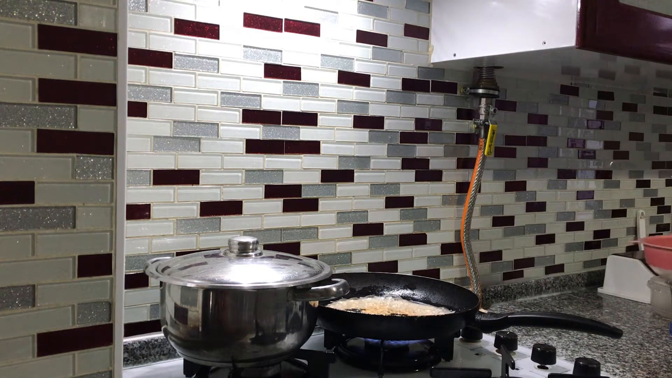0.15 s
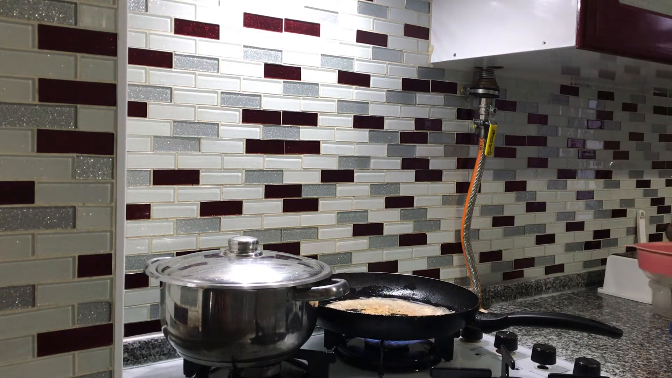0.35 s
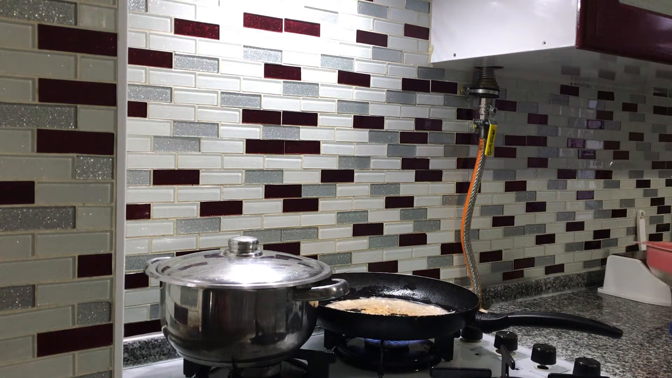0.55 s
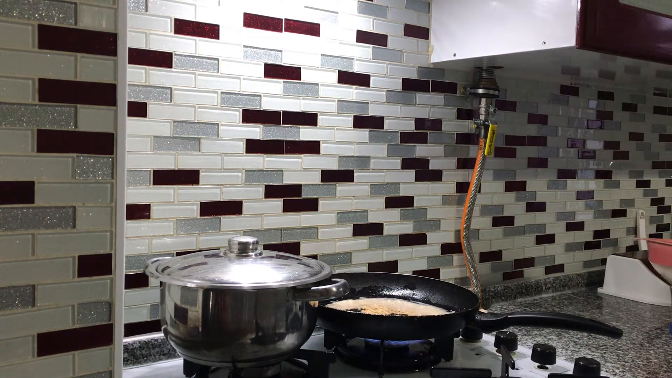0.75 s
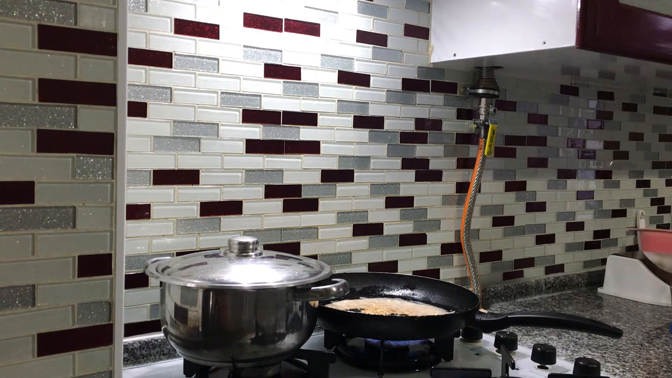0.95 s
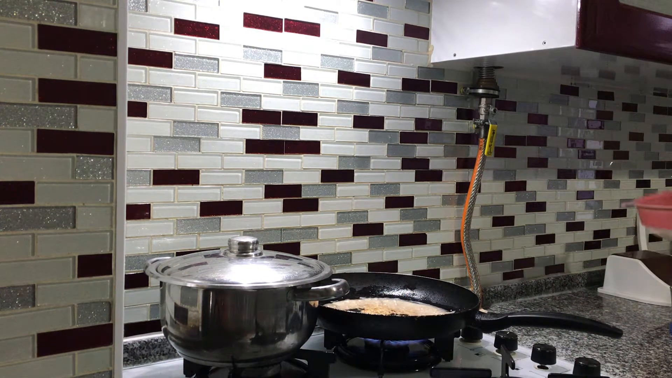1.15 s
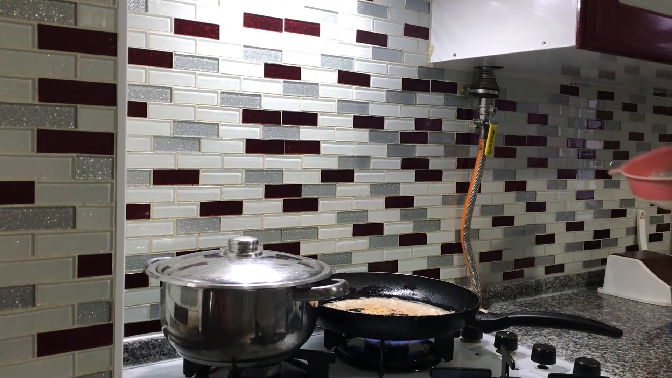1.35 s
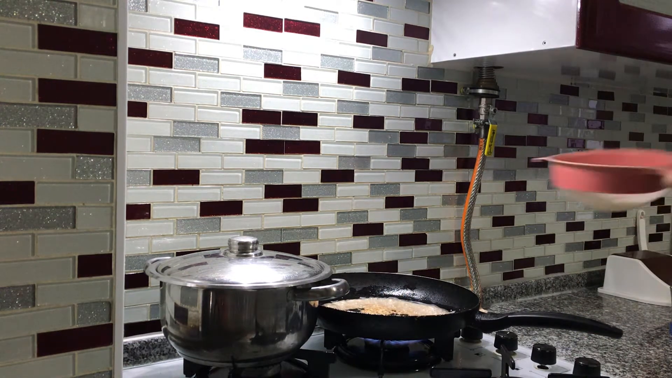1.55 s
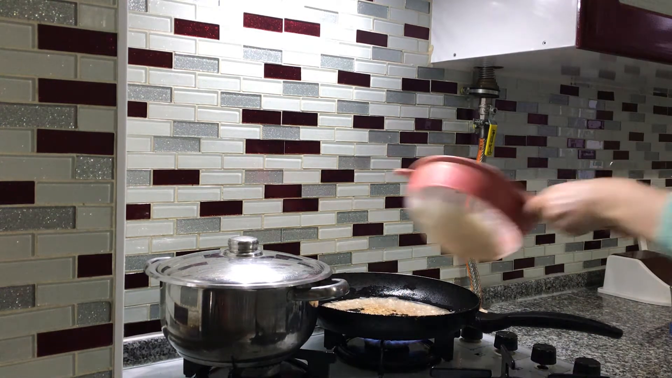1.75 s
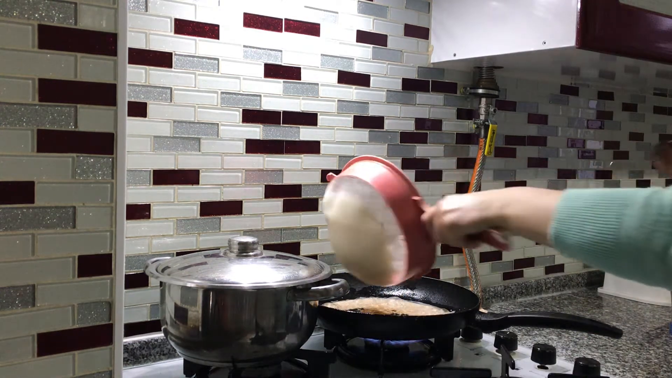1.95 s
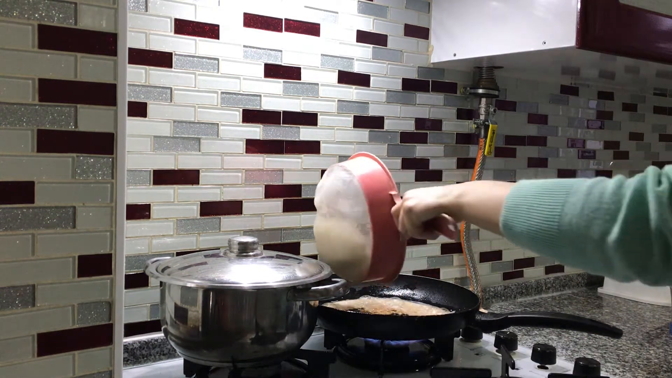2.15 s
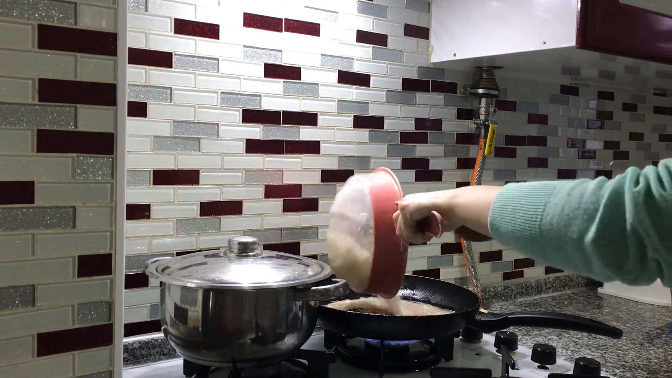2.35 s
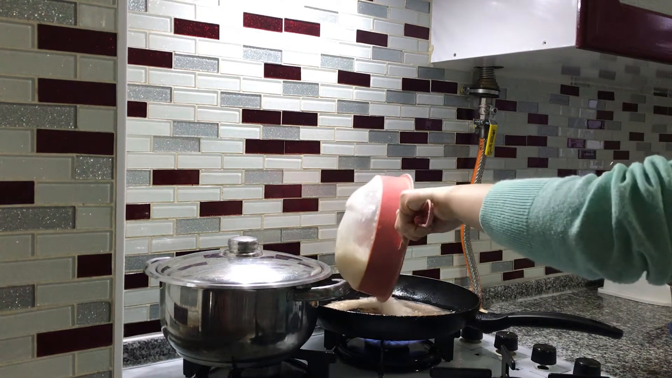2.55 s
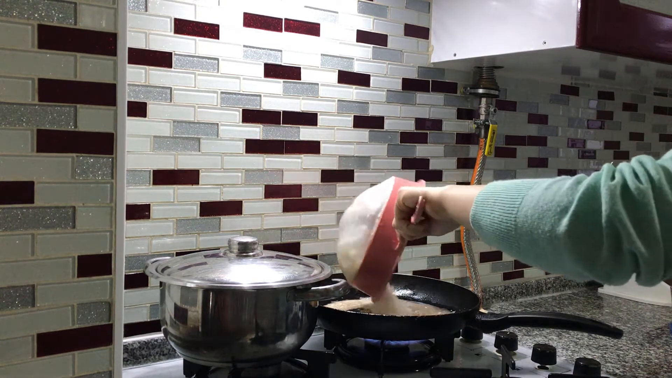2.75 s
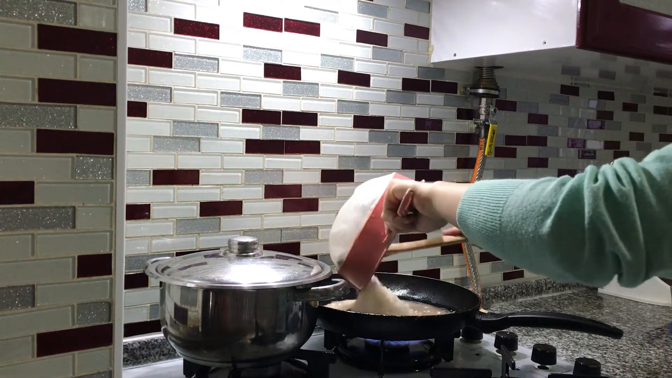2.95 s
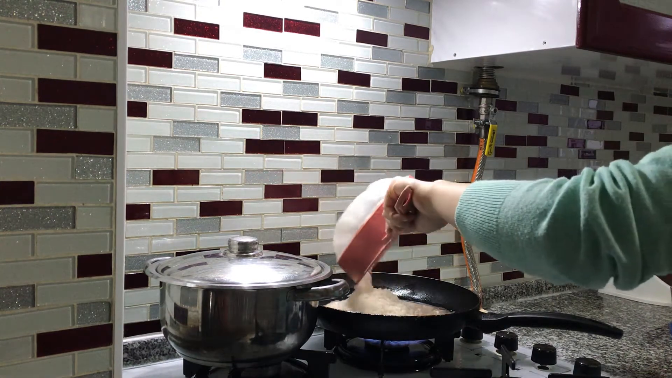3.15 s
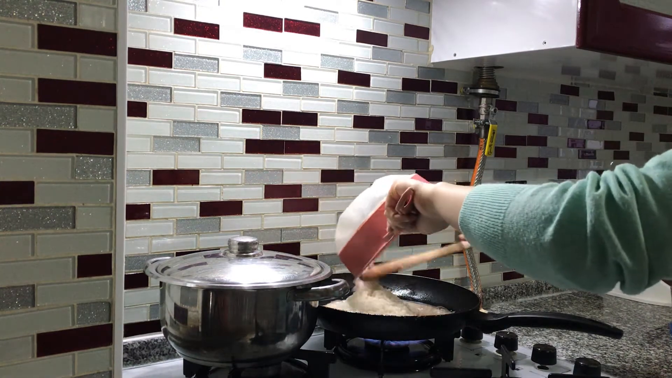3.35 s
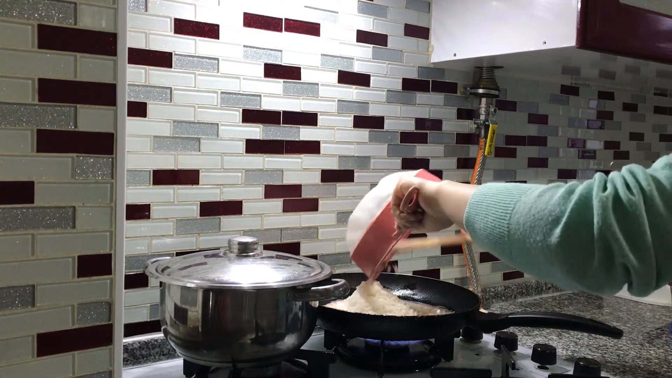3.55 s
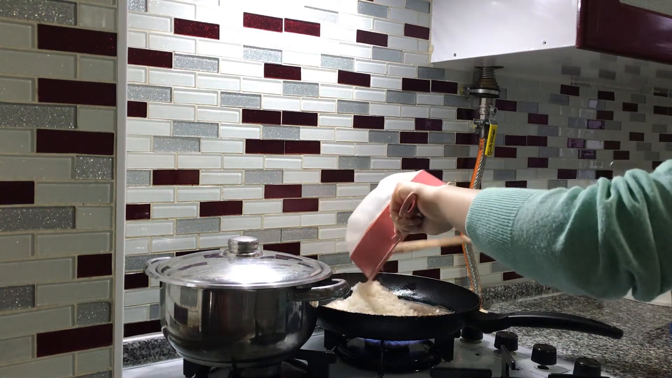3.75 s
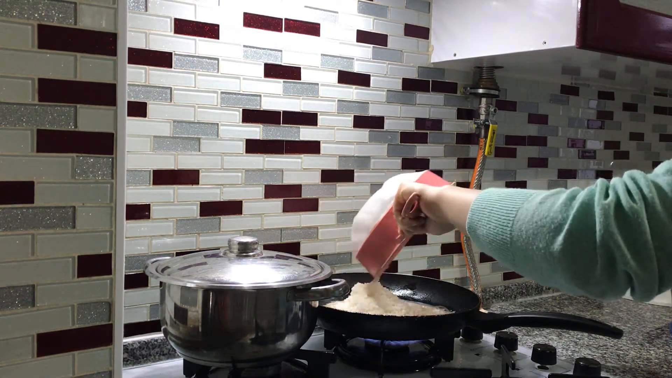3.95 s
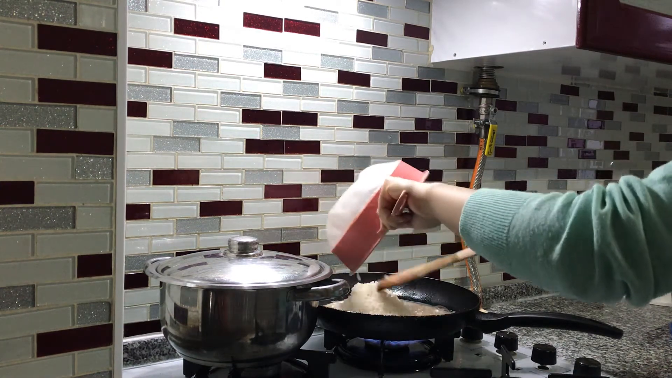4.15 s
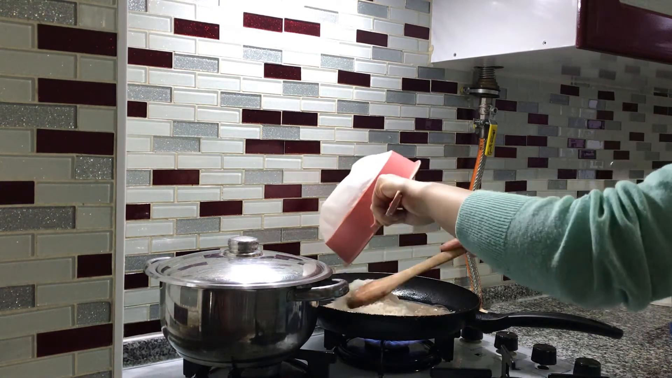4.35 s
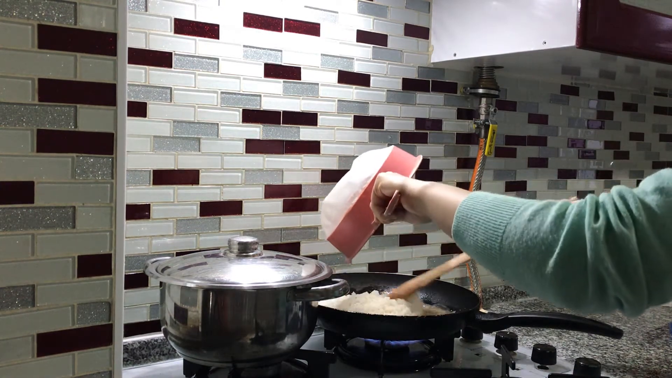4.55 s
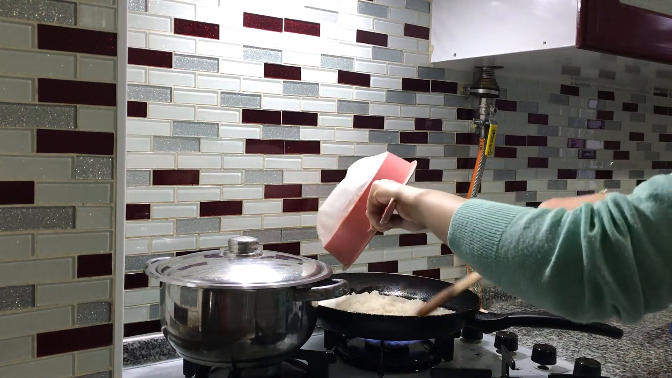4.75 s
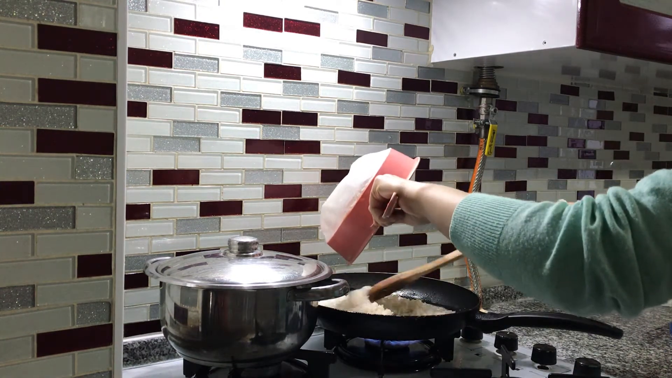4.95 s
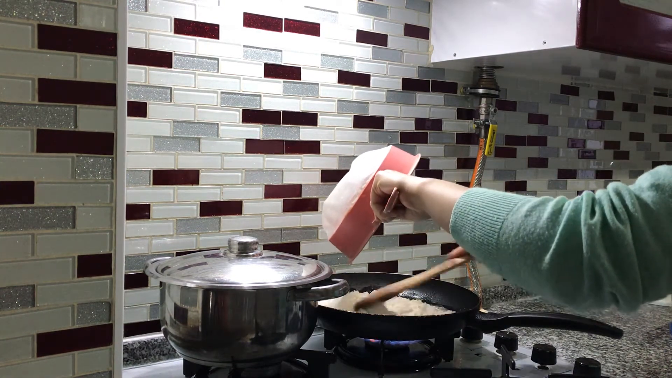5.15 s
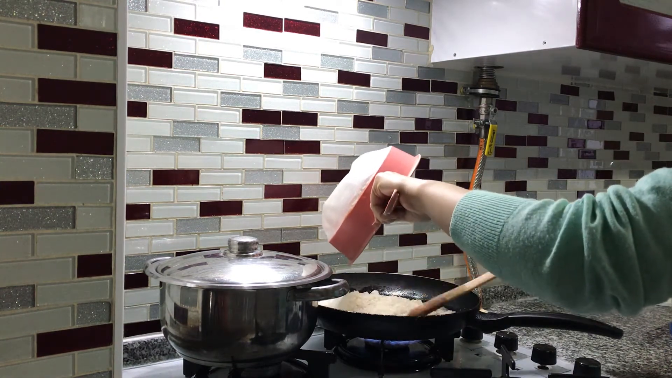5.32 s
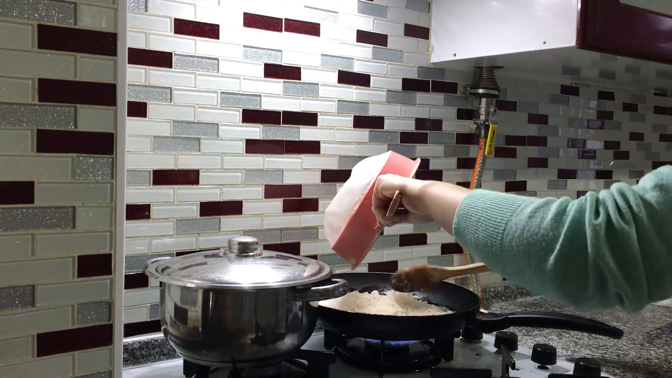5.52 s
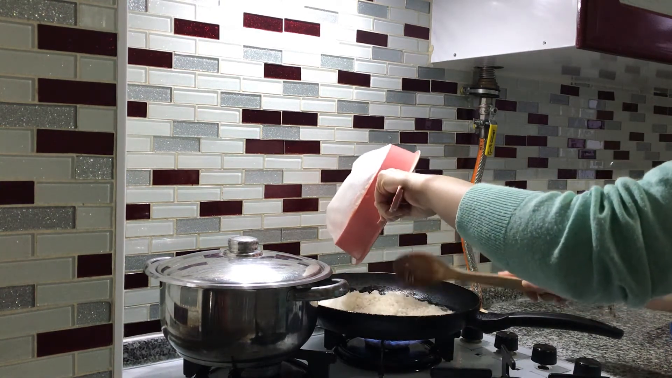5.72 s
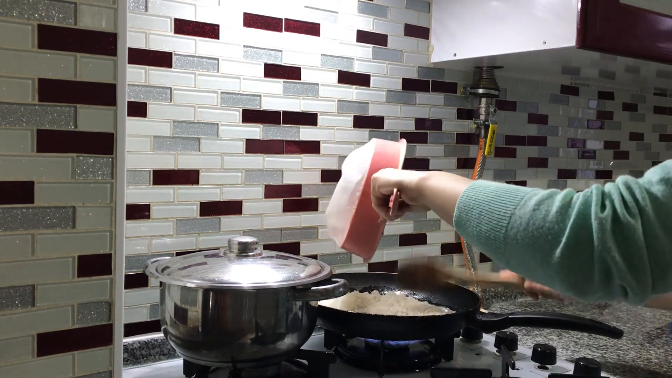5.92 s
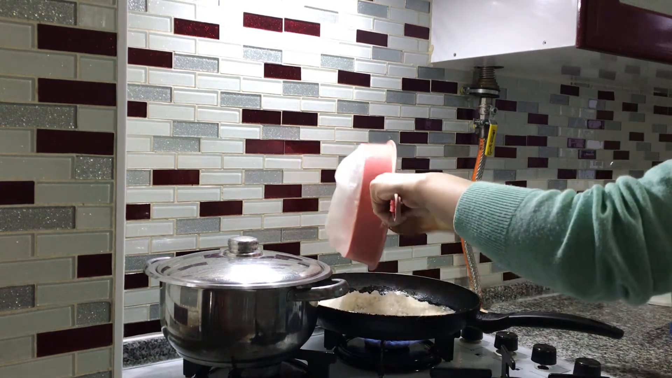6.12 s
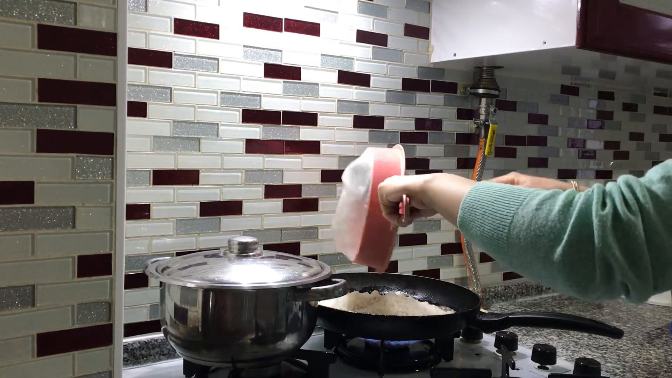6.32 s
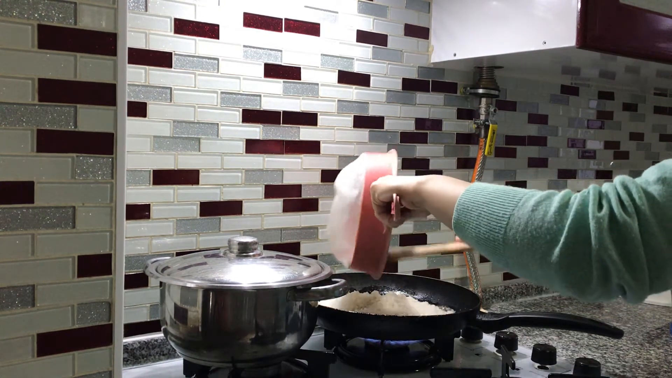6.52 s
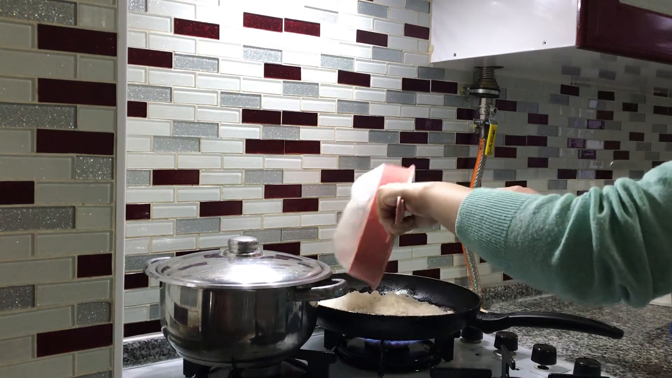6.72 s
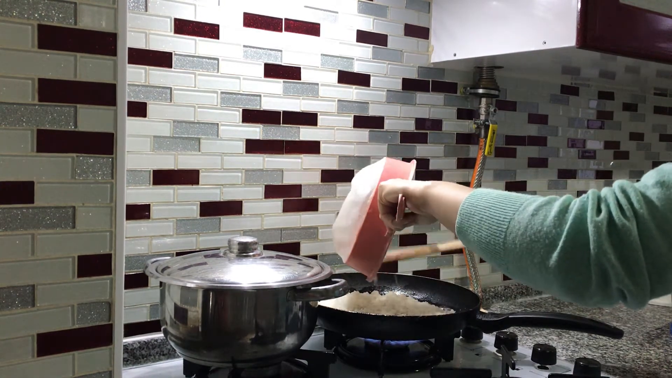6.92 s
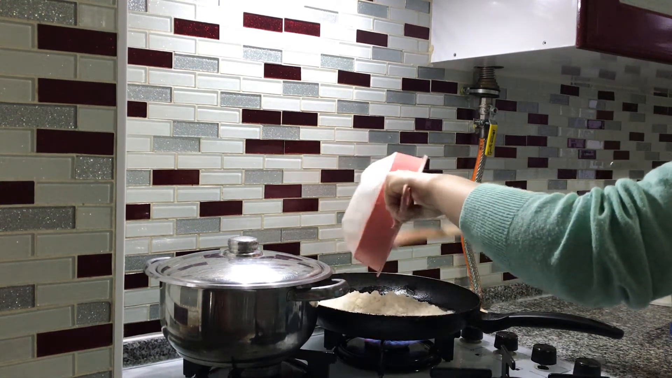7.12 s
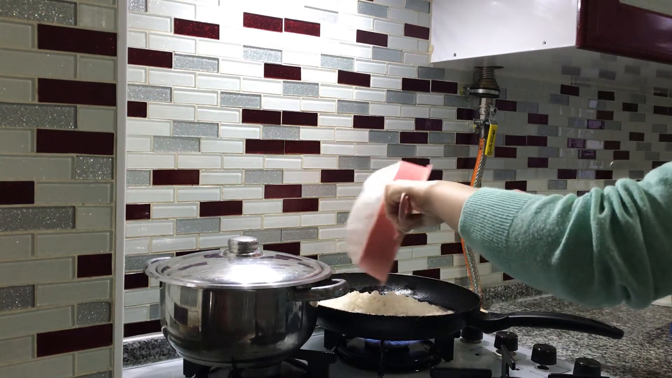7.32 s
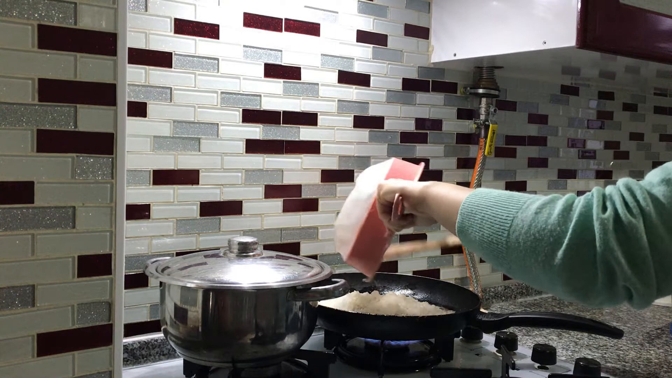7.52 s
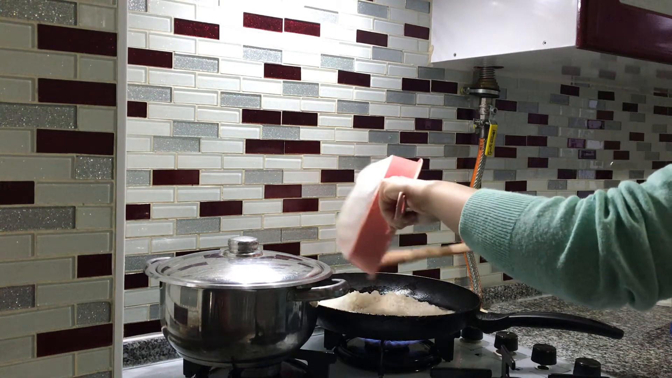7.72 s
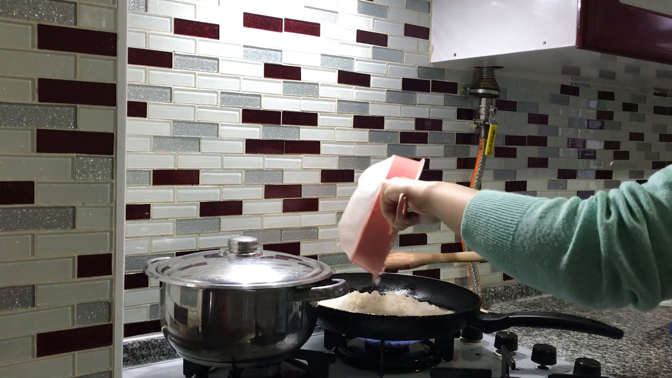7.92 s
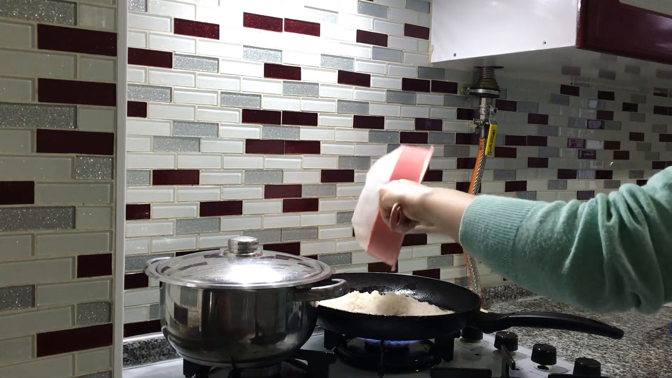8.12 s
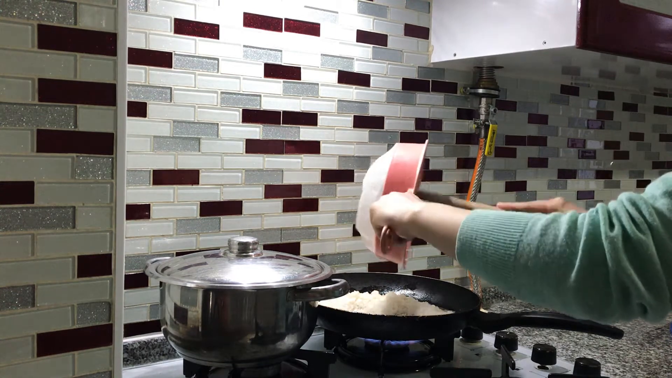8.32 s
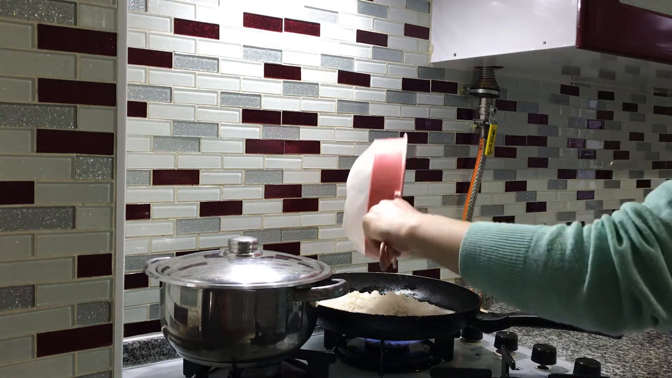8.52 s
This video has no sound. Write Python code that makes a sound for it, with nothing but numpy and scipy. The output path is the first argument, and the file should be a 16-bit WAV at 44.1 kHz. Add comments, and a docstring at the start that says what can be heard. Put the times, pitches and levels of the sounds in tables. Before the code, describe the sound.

A quiet small tiled kitchen with low burner hum and faintly ticking hot fat. From 0.3 to 1.0 s wood scrapes along a stone counter in grainy, uneven clicks with slight groans, strongest near 0.75. At 1.3 s it is set down with a woody clack and quick small bounces. Around 2.1 s wet rice starts landing in the fat: short hissing flares, a very soft brief mid-pitched tone at 2.35, then sizzle growing quickly until 3.3 s and continuing dense and flickering, a little fuller after 5. Sharp spits and sprays cluster from 2.5 to 3.4, with loud snaps near 4.5, 5.6 and 7.9. At 5.7, 5.86 and 6.02 s a wooden spoon knocks the pan rim, low and hollow with rattle. From 6.3 to 8.4 s eight dull plastic sieve taps follow, the last two strongest. The sizzle continues to the end, at 8.6 s.

```python
"""Wet rice sizzles in hot fat in a frying pan: steam gives a flickering hiss, bubbles short decaying tones.
Spits of fat pop and spray over it; a soft brief tone sounds once early in the sizzle. Before the rice goes
in, wood scrapes along the counter as uneven clicks and is set down as ringing modes. Later a wooden spoon
knocks three times on the pan rim (modes, crack and rattle) and taps the plastic sieve (dull filtered noise).
A burner and room hum and the echo of a small tiled kitchen surround it; one microphone feeds both channels."""
import sys
import numpy as np
from scipy import signal
from scipy.fft import rfft, irfft
from scipy.io import wavfile
from scipy.ndimage import uniform_filter1d

SR = 44100
rng = np.random.default_rng(int(sys.argv[2]) if len(sys.argv) > 2 else 0)


def materialize(psi):
    """Save the field psi as 16-bit PCM at rate SR to the path in sys.argv[1].

    A 1-D psi becomes a single channel; in a 2-D psi each row is a channel.
    """
    bounded = np.clip(np.atleast_2d(psi).T, -1, 1)
    quanta = np.round(bounded * 32767).astype(np.int16)
    wavfile.write(sys.argv[1], SR, quanta)


N = 378378  # length in samples

# All spectra are relative: their overall level is set where they are used.
# Burner and room: (frequency [Hz], density [dB per Hz])
HUM_SPECTRUM = [(15, -66), (25, -11.5), (56, -5), (129, 1), (148, -2.5), (162, -14.5), (224, -14.5),
                (375, -28), (401, -21.5), (437, -30), (510, -27), (1500, -27.5), (1950, -70), (3300, -120)]
HUM_DB = -54.5

# Decay of the kitchen echo: (frequency [Hz], t60 [s])
ECHO_DECAY = [(200, 0.45), (1000, 0.43), (4000, 0.18), (12000, 0.36)]
ECHO_DB = -8.0

# Rasp of one push along the counter: (time [s], level [dB])
RASP_LEVEL = [(0.3, -56), (0.38, -62), (0.422, -50.5), (0.494, -55), (0.582, -41), (0.66, -39.5),
              (0.74, -36.5), (0.8, -37), (0.9, -43.5), (0.97, -49), (1.005, -64)]
# Colour of the rasp: (frequency [Hz], density [dB per Hz])
RASP_SPECTRUM = [(350, -45), (600, -34), (812, -10), (915, -10.5), (1960, -12.5), (2430, -7), (2840, -7.5),
                 (3120, -7.5), (4450, -11), (4880, -18), (6000, -12), (14000, -30.5)]
# The wood catches and groans: (time [s], length [s], level [dB], frequency [Hz])
GROANS = [(0.297, 0.26, -60, 660), (0.414, 0.039, -49.5, 1140), (0.518, 0.14, -51, 350),
          (0.793, 0.2, -50, 821), (0.842, 0.15, -53, 238)]
DRAG = 0.35  # contact with the counter shortens the ring by this factor
SCRAPE_RING_DB = -6  # ring of the wood relative to the rasp

# Landing and bounces of the wood: (time [s], strength [dB])
LANDINGS = [(1.285, -6), (1.309, -17), (1.357, -16.5), (1.411, -29)]
# Modes of the wood, ringing freely: (frequency [Hz], relative level [dB], t60 [s])
WOOD_MODES = [(250, -11, 0.19), (428, -18, 0.18), (684, -31, 0.13), (845, 5.5, 0.11), (980, -31, .15),
              (1140, 2.5, 0.15), (1710, -17, 0.082), (1807, -0.5, 0.11), (2200, -17, 0.063),
              (2620, 2.5, 0.053), (3200, -23, .08), (3640, -16, 0.053), (4000, -8, 0.044)]
# Crack of the landing: (frequency [Hz], density [dB per Hz])
CRACK_SPECTRUM = [(88, -36), (150, -16.5), (468, -13), (1130, 0), (1490, -20), (1770, -10), (2600, -15.5),
                  (3600, -16), (15000, -36)]
LANDING_RING_DB, LANDING_CRACK_DB = -6.5, -7.0  # peaks relative to the landing's strength

# A soft brief tone near 800 Hz, then a weaker, lower murmur
TONE_S, TONE_DB, TONE_HZ, TONE_RISE_S, TONE_HOLD_S = 2.351, -44, 795, 0.008, 0.043
MURMUR_LENGTH_S, MURMUR_DB, MURMUR_HZ = 0.095, -53, 626

# Spoon on the pan rim, with rebounds: (time [s], strength [dB], rattle relative to strength [dB],
# bright crack relative to strength [dB], change of the modes under 90 Hz [dB])
KNOCKS = [(5.698, -13.5, -6, -25, 2), (5.719, -19.5, -20, -25, -7), (5.862, -9, -9.5, -5.5, -2),
          (5.889, -19, 0.5, -8, -4), (6.007, -19, -7, -20, -6), (6.023, -12, -2.5, -2, -3),
          (6.036, -12, -1.5, -6, 0)]
# Modes of pan and stove top: (frequency [Hz], relative level [dB], t60 [s])
PAN_MODES = [(44, -11, 0.28), (73.8, -0.5, 0.26), (100.2, -2.5, 0.25), (120, -5, 0.206), (164, -6, 0.17),
             (214, -6, 0.17), (233.4, -7.5, 0.1), (326.5, -17, 0.25), (575, -8, 0.094), (646, -28, 0.27),
             (829, -9, 0.064), (940, -31, .1), (1100, -23, 0.067), (1237, -17.5, 0.2), (1635, -11, 0.048),
             (1900, -11, 0.049), (2370, -15.5, 0.091)]
# Rattle of the pan on its grate: (frequency [Hz], density [dB per Hz])
RATTLE_SPECTRUM = [(88, -22), (150, 4.5), (230, -2), (471, -10), (898, -8), (1040, -4.5), (2070, -18.5),
                   (5000, -39), (6500, -45), (11000, -120)]
KNOCK_RING_DB = -2.5  # peak of the ring relative to the knock's strength
# Spoon against the sieve: (time [s], peak [dB], pitch [Hz], low thud [dB])
TAPS = [(6.289, -23.5, 2050, -35.5), (6.545, -21, 2520, -54), (6.57, -25, 1190, -49),
        (6.869, -22.5, 3120, -58), (7.119, -23, 2260, -39), (7.887, -22, 2590, -37),
        (8.139, -14.5, 2500, -46), (8.41, -16.5, 2700, -39)]
TAP_Q = 1.9

# The loudest spits of fat: (time [s], pop peak [dB], pitch [Hz], spray peak [dB])
SPITS = [(0.092, -38, 12000, -39), (1.7884, -41, 10300, -45), (2.277, -36, 5000, -31.5),
         (2.4496, -27, 9300, -28), (2.5654, -18, 10200, -26), (2.587, -13, 13700, -20),
         (2.6868, -23, 9450, -21.5), (2.708, -24, 9200, -21.5), (2.75, -21, 10000, -26),
         (2.851, -17, 11500, -20), (2.9388, -28, 7100, -18), (3.0548, -17, 12200, -22),
         (3.087, -24, 9100, -17.5), (3.111, -17, 12100, -16.5), (3.3883, -11, 14100, -19),
         (3.729, -13, 11000, -24), (4.4965, -10, 13500, -33), (4.64, -27, 9200, -15.5),
         (5.043, -14.5, 4630, -20.5), (5.1326, -14, 5600, -17.5), (5.6194, -6, 9800, -14.5),
         (6.8205, -20, 4500, -17), (7.099, -13, 5770, -14.5), (7.4, -17, 6000, -17),
         (7.9227, -11, 8450, -16), (7.978, -21, 4000, -19)]
# Smaller spits at random: mean rate, highest peaks of pop and spray relative to the vigour, pitch range
STRAY_PER_S, STRAY_DB, STRAY_SPRAY_DB, STRAY_HZ = 4.7, 12, 3, (3950, 13000)

# Slow swell of the boiling rice: (time [s], vigour [dB])
BOIL_LEVEL = [(2.05, -78), (2.12, -51), (2.3, -54), (2.5, -45.5), (2.75, -36), (3.0, -32.5), (3.3, -31),
              (4.1, -30), (4.8, -30.5), (5.15, -27), (5.7, -27.5), (6.3, -26), (7.2, -27), (7.6, -27),
              (8.58, -27)]
# The first wet clumps land and flare: (time [s], level [dB])
CLUMPS = [(2.195, -41), (2.352, -35), (2.59, -40), (2.685, -52)]
FLARE_RISE_S, FLARE_T60_S = 0.013, 1
# Small steam bubbles: (frequency [Hz], density [dB per Hz])
FIZZ_SPECTRUM = [(1120, -34), (1900, -12), (3580, -3), (4930, -1), (5790, -2.5), (9460, -2), (10400, -3),
                 (14500, -3.5), (16000, -8.5)]
# Larger bubbles sounding through the pan: (frequency [Hz], density [dB per Hz])
BODY_SPECTRUM = [(120, -50), (200, -38), (345, -8), (438, -19), (545, -11.5), (731, -14), (1230, 1),
                 (1420, -7.5), (1580, -3.5), (2700, -4), (3510, -1.5), (5940, -120)]
# Level of the larger bubbles relative to the fizz at a full boil, and its change per dB of vigour
BODY_DB, BODY_SLOPE, FULL_BOIL_DB = -16, -0.37, -28
# Fat ticking over, with or without rice: (frequency [Hz], density [dB per Hz])
IDLE_SPECTRUM = [(290, -41), (500, -13), (1400, -5), (1640, 0), (2190, -5), (3340, -3.5), (5710, -4.5),
                 (7860, -5.5), (10500, -7), (16000, -10.5)]
IDLE_DB = -56.5

# Dips from the microphone housing: (frequency [Hz], width [Hz], depth [dB])
HOUSING_DIPS = [(4950, 155, -6), (7610, 400, -4), (10430, 560, -5)]
# The level dips briefly: (time [s], length [s], change below the split [dB], change above the split [dB])
LEVEL_DIPS = [(0.324, .02, -6, -9), (0.603, .016, -3, -6), (0.835, .02, -4, -7), (0.951, .016, -3, -7),
              (0.997, .016, -4, -7), (2.18, 0.016, -9, -8), (2.251, .016, -9, -6), (2.366, .014, -4, -6),
              (2.665, 0.033, -35, -6.5), (3.017, 0.016, -9, -7), (3.482, .018, -13, -7),
              (3.575, .016, -13, -7), (3.691, .016, -10, -5), (3.807, .016, -11, -8), (3.9, .018, -12, -9),
              (3.969, .016, -10, -4), (4.318, .018, -10, -4), (4.594, 0.055, -36, -7),
              (4.991, 0.016, -9, -6), (6.012, 0.016, 0, -9)]
BASS_CUT_HZ, SPLIT_HZ, EDGE_HZ = 44, 2300, 15900


def gain_of(db):
    """Logarithmic level: 20 dB are a factor of ten in amplitude."""
    return 10 ** (np.asarray(db) / 20)


def evened(x):
    """Power normalisation: scales to an rms of 1."""
    return x / np.sqrt(np.mean(x ** 2) + 1e-20)


def peaked(x, db):
    """Peak normalisation: scales the largest excursion to a level."""
    return gain_of(db) * x / abs(x).max()


def read(points, hz):
    """Interpolation along a logarithmic frequency axis."""
    f, value = np.transpose(points)
    return np.interp(np.log(hz + 1), np.log(f + 1), value)


def level_curve(points):
    """Linear interpolation of a level over time, sample by sample."""
    s, db = np.transpose(points)
    return np.interp(np.arange(N) / SR, s, db)


def colour(x, points):
    """Spectral shaping: weights each frequency of a wide sound, then scales to an rms of 1."""
    weight_db = read(points, np.fft.rfftfreq(len(x), 1 / SR))
    return evened(irfft(rfft(x) * gain_of(weight_db), len(x)))


def add(mix, s, sound):
    """Superposition: adds a sound to the mix from a given time on."""
    part = mix[round(s * SR):][:len(sound)]
    part += sound[:len(part)]


def ringing(modes, detune=0):
    """Modal decay: a blow excites dying sines, pitches and weights shifting as it lands elsewhere."""
    t = np.arange(SR // 2) / SR
    out = np.zeros(len(t))
    for hz, db, t60 in modes:
        pitch_shift, weight_shift = detune * rng.standard_normal(2)
        envelope = gain_of(db + 86 * weight_shift - 60 * t / t60)
        out += envelope * np.sin(2 * np.pi * hz * (1 + pitch_shift) * t)
    return out


def puff(t60, points=None, size=12000):
    """Exponential decay of a noise burst, white or with a spectrum."""
    noise = rng.standard_normal(size)
    if points is not None:
        noise = colour(noise, points)
    return noise * gain_of(-60 * np.arange(size) / SR / t60)


def resonate(x, hz, keep):
    """Narrow resonance by heterodyning: shift its frequency to zero, smooth, shift back."""
    turn = np.exp(2j * np.pi * hz * np.arange(len(x)) / SR)
    smooth = signal.lfilter([1], [1, -keep], x / turn)
    return evened((turn * smooth).real)


def seethe(patchy_db, flicker_db):
    """Modulated noise: white hiss drifts in patches and flickers in bursts with sudden start, slow end."""
    frames = N // 64 + 5
    real, imaginary, patches = rng.standard_normal((3, 129, frames))
    patches = uniform_filter1d(patches, 12, 0)  # smooth across frequency, then time
    patches = evened(uniform_filter1d(patches, 14, 1))
    kicks = np.minimum(rng.exponential(1, frames), 4.5) ** 2 - 2
    bursts = evened(signal.lfilter([1], [1, -0.9], kicks))
    z = (real + 1j * imaginary) * gain_of(patchy_db * patches + flicker_db * bursts)
    return evened(signal.istft(z, nperseg=256, noverlap=192)[1][:N])


def hum():
    """Stationary noise: burner and room sound as low noise with slight drift."""
    return gain_of(HUM_DB) * colour(seethe(0.91, 0.46), HUM_SPECTRUM)


def kitchen(x):
    """Reverberation: tiled walls return a noise tail whose bands die at their own speeds."""
    hz, t, z = signal.stft(rng.standard_normal(SR // 2), SR, nperseg=256)
    decay = gain_of(-60 * t / read(ECHO_DECAY, hz)[:, None])
    tail = signal.istft(z * decay, SR, nperseg=256)[1]
    tail = np.append(np.zeros(200), tail)  # delay in samples before the echo
    # too small a room to hold the deepest bass
    x = signal.lfilter(*signal.butter(2, 140, "high", fs=SR), x)
    return signal.oaconvolve(x, tail / np.linalg.norm(tail))[:N]


def slide():
    """Friction: wood scrapes over stone in dense uneven clicks that make it ring and groan."""
    t = np.arange(N) / SR
    moving = (t > RASP_LEVEL[0][0]) * (t < RASP_LEVEL[-1][0])
    grit = seethe(1.5, 0.62) * gain_of(0.7 * np.minimum(rng.exponential(1, N), 5))
    dragged_modes = [(hz, db, t60 * DRAG) for hz, db, t60 in [WOOD_MODES[3]] + WOOD_MODES[5:]]
    ring = evened(signal.oaconvolve(grit, ringing(dragged_modes))[:N])
    scrape = colour(grit, RASP_SPECTRUM) + gain_of(SCRAPE_RING_DB) * ring
    out = moving * gain_of(level_curve(RASP_LEVEL)) * scrape
    for s, length, db, hz in GROANS:
        swell = np.sin(np.pi * np.arange(0, length, 1 / SR) / length)
        groan = resonate(grit[round(s * SR):][:len(swell)], hz, 1 - 1e-4)
        add(out, s, gain_of(db) * swell * groan)
    return out


def set_down():
    """Impact: each landing and bounce excites the modes of the wood and a crack."""
    out = np.zeros(N)
    for s, db in LANDINGS:
        add(out, s, peaked(ringing(WOOD_MODES, 0.018), db + LANDING_RING_DB))
        add(out, s, peaked(puff(0.19, CRACK_SPECTRUM), db + LANDING_CRACK_DB))
    return out


def soft_tone():
    """Brief tone: a short sine with a fuzzy edge, then a lower narrow-band murmur."""
    out = np.zeros(N)
    t, late = np.arange(0, TONE_HOLD_S, 1 / SR), np.arange(0, MURMUR_LENGTH_S, 1 / SR)
    fuzz = resonate(rng.standard_normal(len(t)), TONE_HZ, 0.96)
    tone = np.sin(2 * np.pi * TONE_HZ * t) + 0.33 * fuzz
    envelope = np.minimum(np.minimum(t, t[::-1]) / TONE_RISE_S, 1)
    add(out, TONE_S, gain_of(TONE_DB) * envelope * tone)
    murmur = resonate(rng.standard_normal(len(late)), MURMUR_HZ, 0.993)
    swell = np.sin(np.pi * late / MURMUR_LENGTH_S)
    add(out, TONE_S + TONE_HOLD_S, gain_of(MURMUR_DB) * swell * murmur)
    return out


def knocks():
    """Impact on coupled bodies: the spoon shakes pan and stove top, and the pan rattles on its grate."""
    out = np.zeros(N)
    for s, db, rattle_db, crack_db, deep_db in KNOCKS:
        modes = [(hz, mode_db + deep_db * (hz < 90), t60) for hz, mode_db, t60 in PAN_MODES]
        ring = ringing(modes, 0.015)
        # the heavy stove top takes time to move
        ring = ring * (1 - np.exp(-np.arange(len(ring)) / SR / 0.0066))
        crack = signal.lfilter(*signal.iirpeak(4200, 0.6, SR), puff(0.087))
        add(out, s, peaked(ring, db + KNOCK_RING_DB))
        add(out, s, peaked(puff(0.24, RATTLE_SPECTRUM), db + rattle_db))
        add(out, s, peaked(crack, db + crack_db))
    return out


def taps():
    """Damped impact: the spoon on the sieve gives short dull noise and a low thud."""
    out, t = np.zeros(N), np.arange(4000) / SR
    for s, db, hz, thud_db in TAPS:
        add(out, s, peaked(signal.lfilter(*signal.iirpeak(hz, TAP_Q, SR), puff(0.073)), db))
        add(out, s, gain_of(thud_db - 60 * t / 0.028) * np.sin(2 * np.pi * 330 * t))
    return out


def stray_spits(vigour_db):
    """Random arrivals: smaller spits at irregular intervals, their level following the boil."""
    lo, hi = STRAY_HZ
    when = np.cumsum(2 * rng.random(100) / STRAY_PER_S)
    strays = []
    for s in when[when * SR < N]:
        db = vigour_db[int(s * SR)] - 6 * rng.random()
        hz = lo * (hi / lo) ** rng.random()
        strays.append((s, db + STRAY_DB, hz, db + STRAY_SPRAY_DB))
    return strays


def spits(vigour_db):
    """Sudden release: a bursting droplet gives a pop of a few cycles and a short spray."""
    out, t = np.zeros(N), np.arange(3000) / SR
    for s, db, hz, spray_db in SPITS + stray_spits(vigour_db):
        pop = np.sin(2 * np.pi * hz * t) * t * np.exp(-t * hz / 0.94)
        spray = signal.lfilter(*signal.iirpeak(hz, 1.3, SR), puff(0.067, size=3000))
        add(out, s, peaked(pop, db) + peaked(spray, spray_db))
    return out


def vigour():
    """Addition of powers: the level of the boil in dB joins a slow swell and a flare after each clump."""
    t = np.arange(N) / SR
    power = gain_of(level_curve(BOIL_LEVEL)) ** 2 * (t > BOIL_LEVEL[0][0])
    for s, db in CLUMPS:
        age = np.maximum(t - s, 0)
        rise = np.minimum(age / FLARE_RISE_S, 1)
        power = power + (gain_of(db - 60 * age / FLARE_T60_S) * rise) ** 2
    return 10 * np.log10(power + 1e-12)


def bubbles(per_s, spread_db, lo_hz, hi_hz, cycles, count=24):
    """Bubble resonance: bursts at random moments sound as short tones of many pitches, a few large."""
    out = np.zeros(N)
    size = gain_of(spread_db * np.minimum(rng.exponential(1, N), 5))
    size = size * (rng.random(N) < per_s / SR)
    kind = rng.integers(0, count, N)
    for k, hz in enumerate(np.geomspace(lo_hz, hi_hz, count)):
        turns = np.arange(300) * hz / SR
        tone = hz * np.sin(2 * np.pi * turns) * np.exp(-turns / cycles)
        out += signal.oaconvolve(size * (kind == k), tone)[:N]
    return evened(out)


def sizzle(vigour_db):
    """Boiling: water leaves the fat as hiss and crackle on top, larger bubbles below."""
    body_db = BODY_DB + BODY_SLOPE * (vigour_db - FULL_BOIL_DB)
    fizz = seethe(1.7, 0.59) + 0.32 * bubbles(2500, 3.2, 2110, 14700, 0.57)
    body = seethe(0.58, 1.0) + 0.5 * bubbles(700, 1.55, 499, 3500, 2.9)
    # the extra point extends the idle spectrum downwards
    idle = gain_of(IDLE_DB) * colour(seethe(1.3, 1.0), [(250, -40)] + IDLE_SPECTRUM)
    boil = colour(fizz, FIZZ_SPECTRUM) + gain_of(body_db) * colour(body, BODY_SPECTRUM)
    return idle + gain_of(vigour_db) * boil


def scene():
    """Superposition: all sources but the hum also return from the walls."""
    vigour_db = vigour()
    sources = slide() + set_down() + soft_tone() + knocks() + taps() + spits(vigour_db) + sizzle(vigour_db)
    mix = hum() + sources + kitchen(gain_of(ECHO_DB) * sources)
    return np.array([mix, mix])


def record(dry):
    """Linear filtering and gain: bass cut, narrow housing dips, brief level dips, then the band limit."""
    hz, t = np.fft.rfftfreq(N, 1 / SR), np.arange(N) / SR
    housing_db = sum(db / (1 + (2 * (hz - f) / width) ** 2) for f, width, db in HOUSING_DIPS)
    bass_cut = signal.butter(N=4, Wn=BASS_CUT_HZ, btype="high", fs=SR, output="sos")
    heard = rfft(signal.sosfilt(bass_cut, dry)) * gain_of(housing_db)
    low, high = irfft(heard * (hz < SPLIT_HZ), N), irfft(heard * (hz >= SPLIT_HZ), N)
    for s, length, low_db, high_db in LEVEL_DIPS:
        dip = np.exp(-(2 * (t - s) / length) ** 4)
        low, high = low * gain_of(low_db * dip), high * gain_of(high_db * dip)
    band_limit = signal.firwin(511, EDGE_HZ, window=("kaiser", 9), fs=SR)
    return signal.oaconvolve(low + high, band_limit[None], "same")


dry = scene()
out = record(dry)
materialize(out)
```